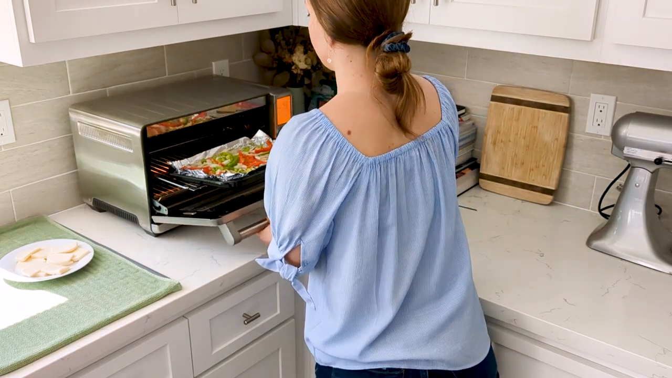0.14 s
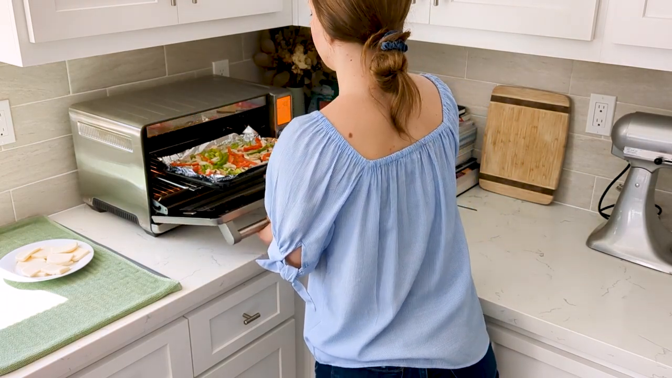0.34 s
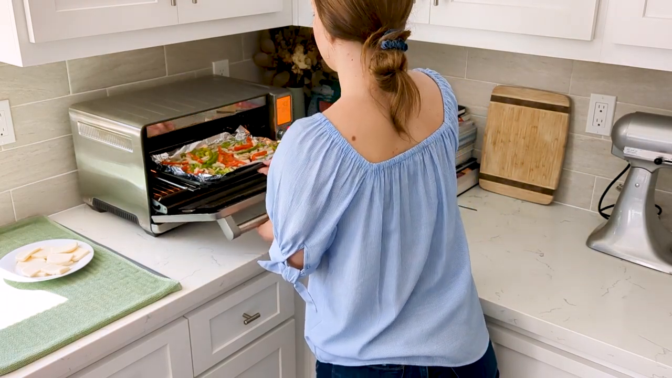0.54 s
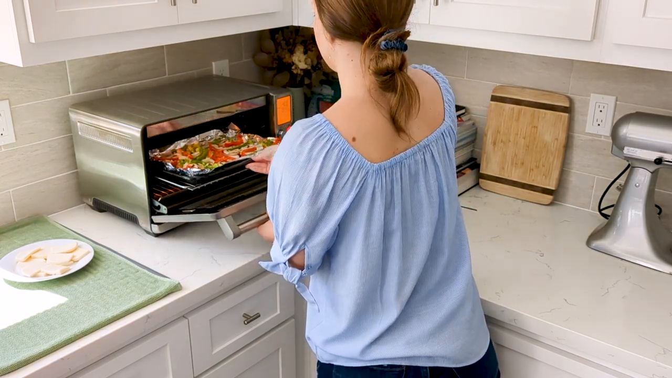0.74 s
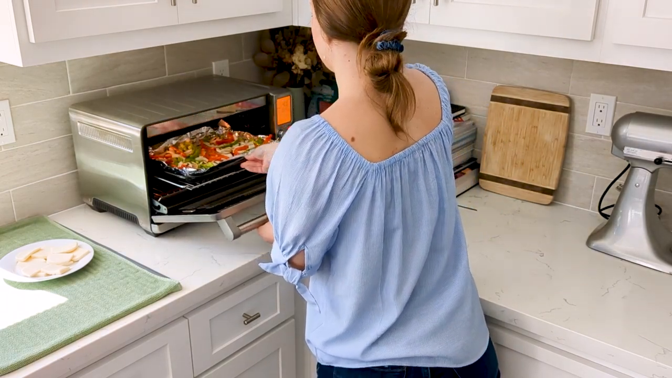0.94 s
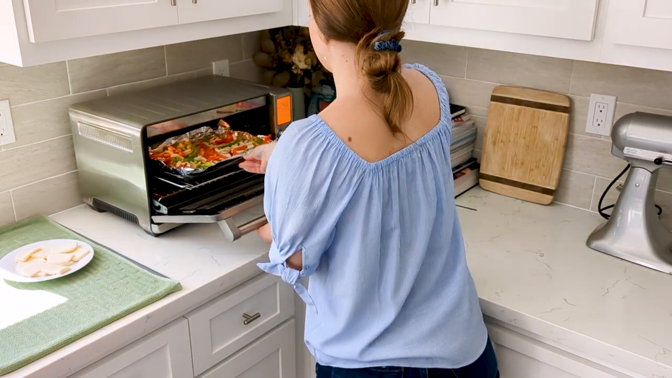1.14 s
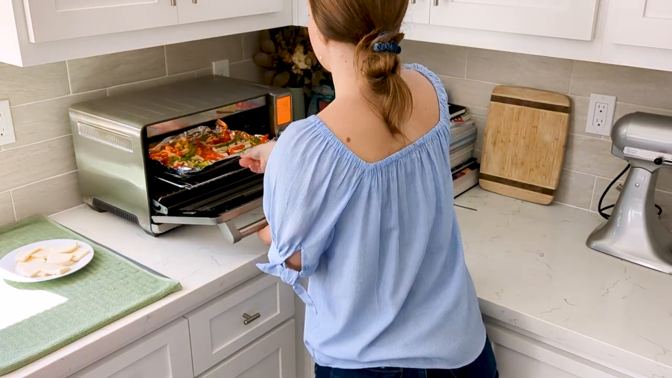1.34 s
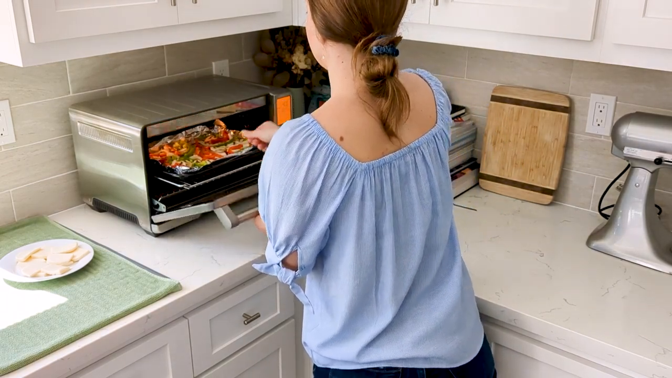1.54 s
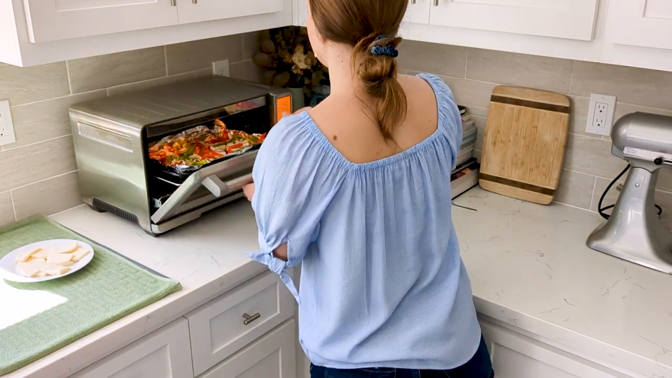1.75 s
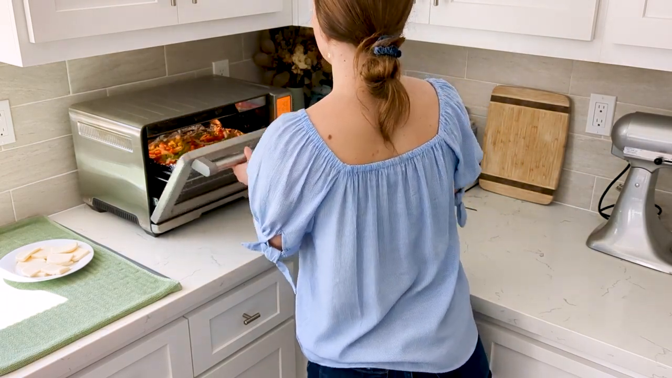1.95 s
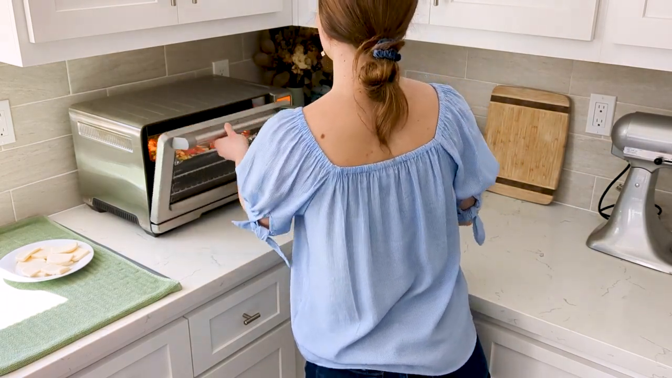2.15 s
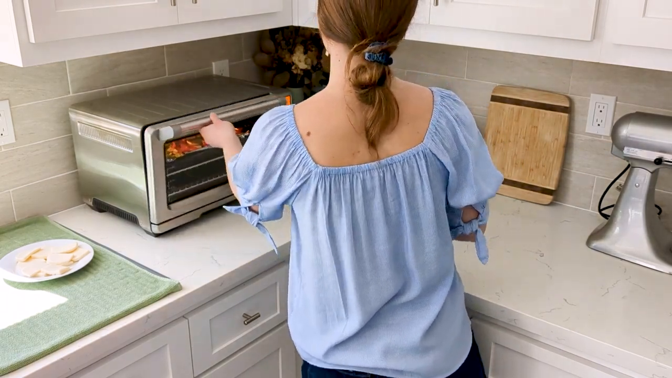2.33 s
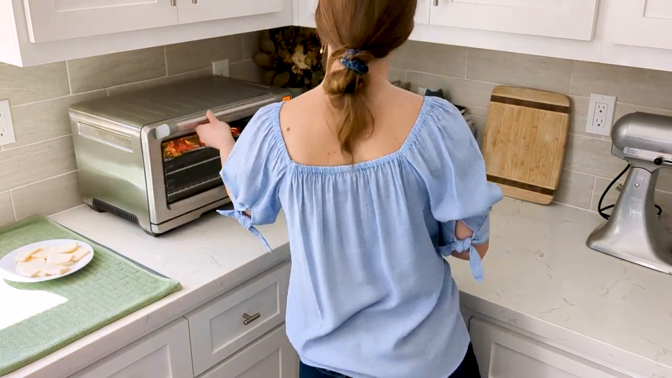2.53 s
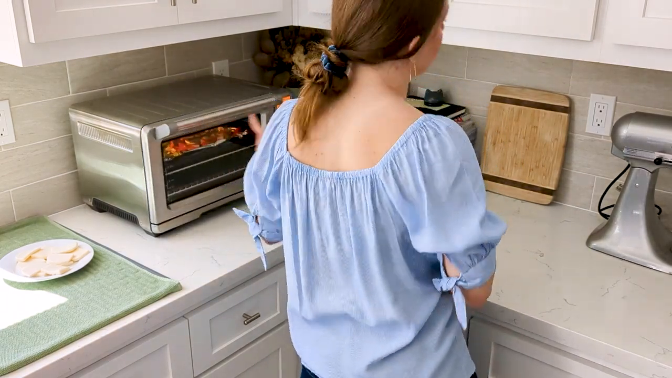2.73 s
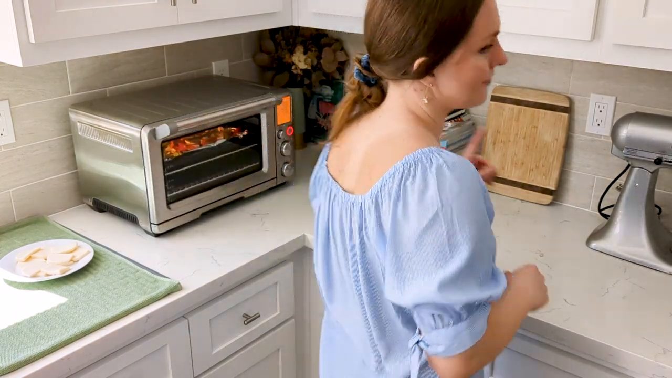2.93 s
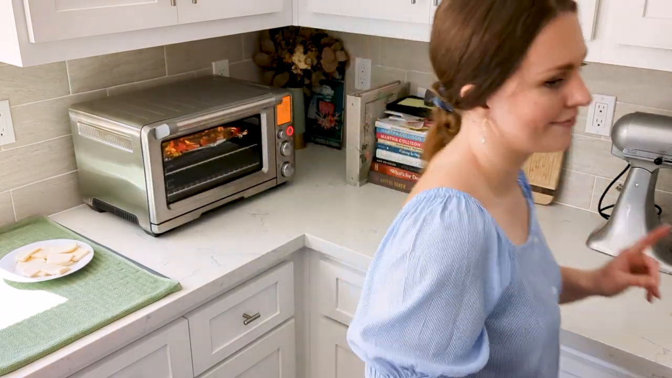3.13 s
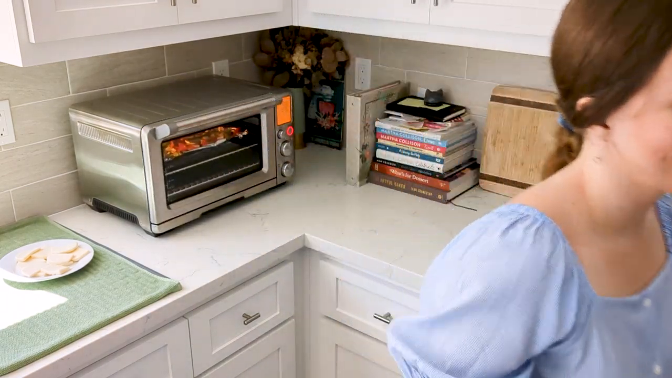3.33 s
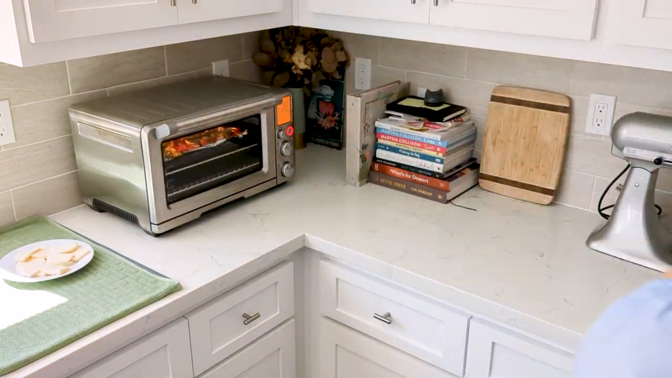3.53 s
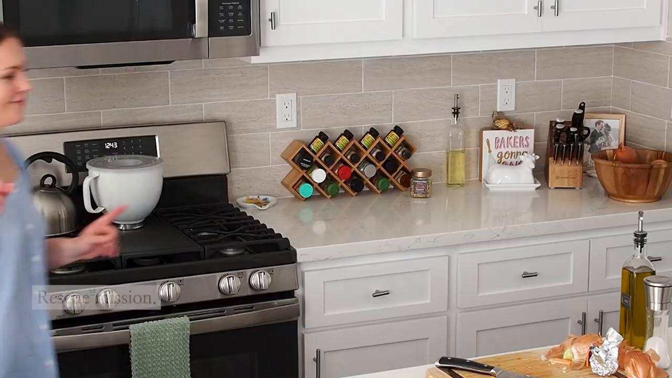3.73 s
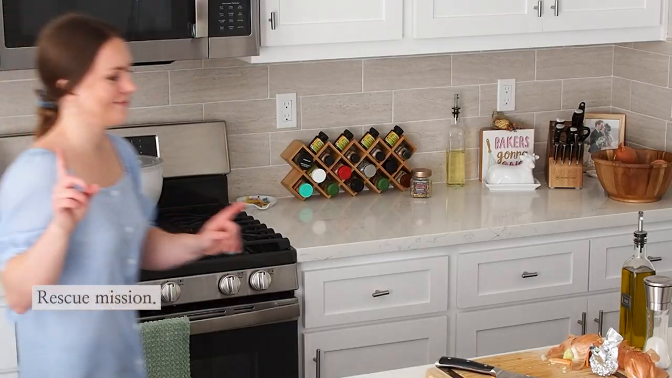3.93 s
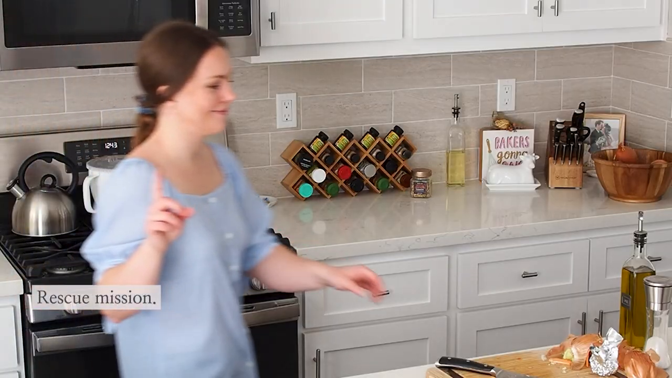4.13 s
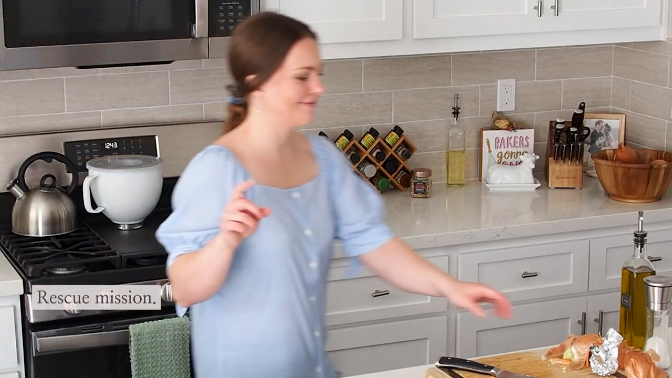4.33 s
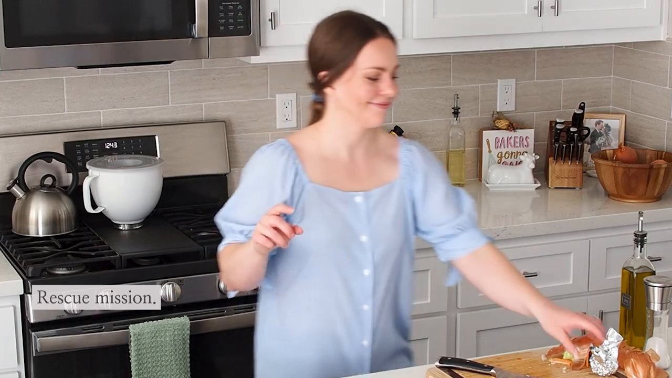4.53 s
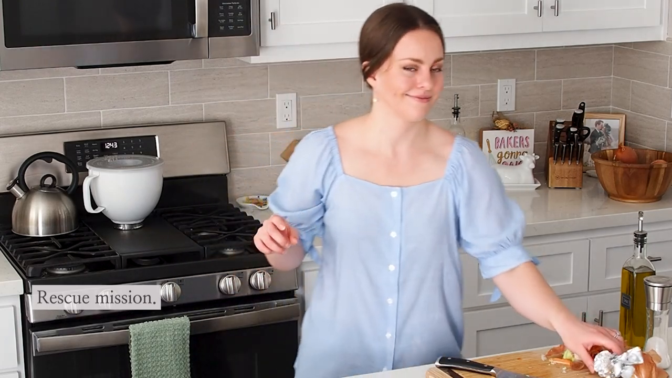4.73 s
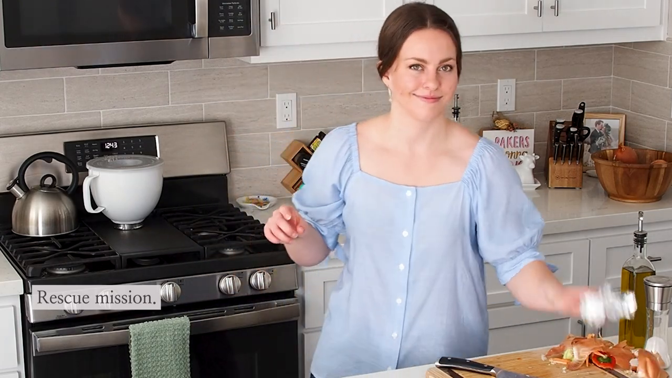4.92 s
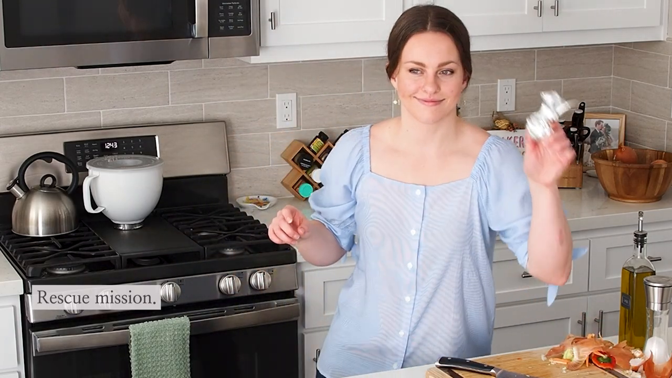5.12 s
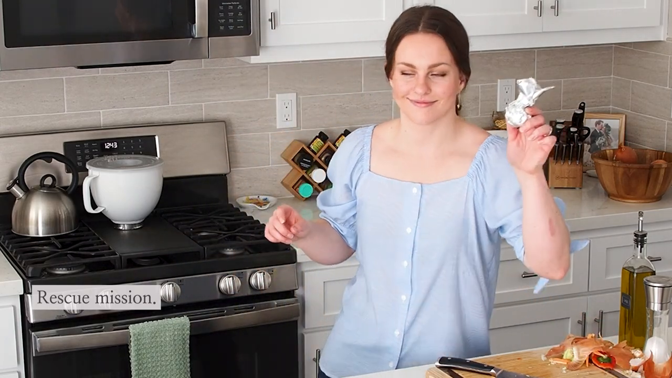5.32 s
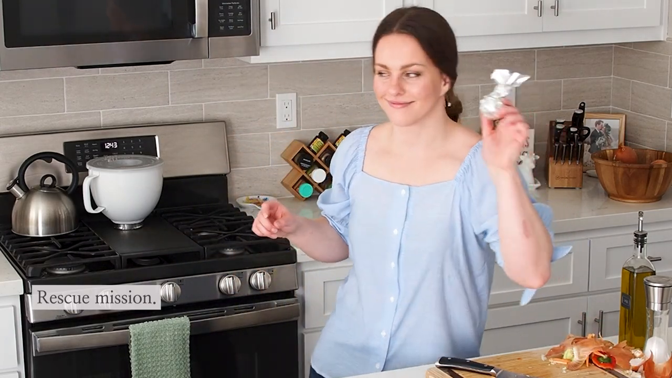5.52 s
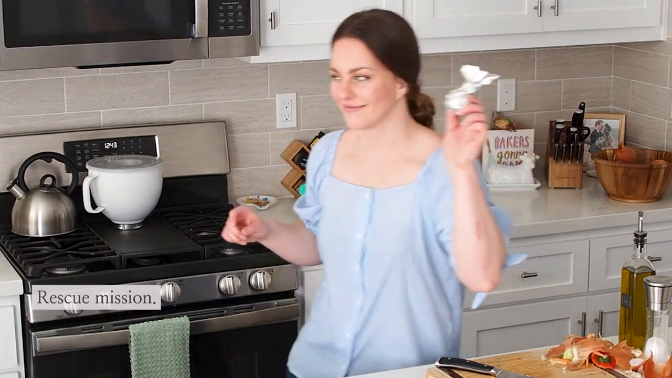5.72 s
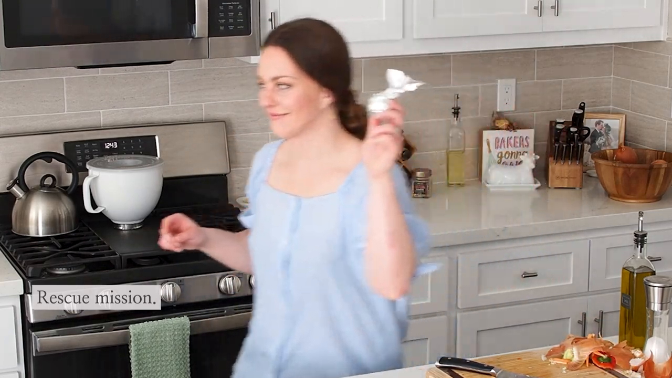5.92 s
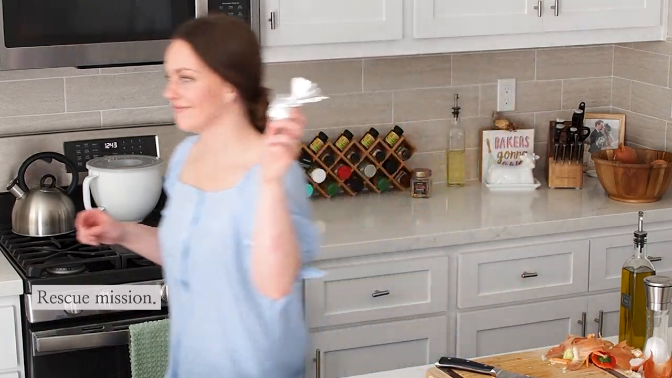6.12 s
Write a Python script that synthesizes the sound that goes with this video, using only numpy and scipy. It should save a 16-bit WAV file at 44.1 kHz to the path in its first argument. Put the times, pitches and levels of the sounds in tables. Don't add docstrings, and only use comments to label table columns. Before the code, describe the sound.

Close kitchen sounds: sheet pan rattling on wire rack, one sharp hinge jolt, muted oven door thud, fan hum, then crisp foil crumpling.

```python
import sys
import numpy as np
from scipy import signal
from scipy.fft import rfft, irfft, next_fast_len
from scipy.io import wavfile

SR = 44100
rng = np.random.default_rng(int(sys.argv[2]) if len(sys.argv) > 2 else 0)


def voltage_ratio(decibels):
    exponent = np.asarray(decibels, float) / 20
    return 10 ** exponent


def store_wav(level_fs):
    pcm = np.round(np.clip(np.atleast_2d(level_fs), -1, 1) * 32767)
    wavfile.write(sys.argv[1], SR, pcm.T.astype(np.int16))


N = 271920
TIME = np.arange(N) / SR
PAN_END = int(2.9 * SR)
LONGEST = int(.6 * SR)
SECOND_SPOT_S = 3.74
SHUT_S, SHUTTING_S = 1.5, 0.15

# [f/Hz, level/dB per Hz]
FAN_SPECTRUM = [(35, -46), (60, -20), (146, -12.5), (180, -25.5), (294, -16), (330, -8), (427, -19.5),
                (469, -12.5), (749, -19.5), (991, -19), (1250, -21), (7060, -39.5), (16000, -42.5)]
# [f/Hz, width/Hz, level/dB]
DUCT_RINGS = [(90, 10, 10.5), (145.6, 6.1, 10), (209, 17, 10.5), (326, 16, 1), (497, 7, 7.5),
              (1025.4, 11.5, 13), (1138, 43, 6), (1795, 73, 4)]
# [peak t/s, level/dB, half length/ms]
MIC_NUDGES = [(.14, -44.5, 72), (.38, -49, 70), (.62, -42, 90), (.98, -45, 180), (1.79, -51, 120),
              (2.0, -52, 70), (2.25, -47, 79), (2.53, -52, 70), (4.14, -50, 120), (4.5, -55, 170),
              (4.75, -45, 133), (5.15, -46.5, 74), (5.34, -52, 75), (5.63, -41.5, 59), (5.88, -55, 58),
              (6.06, -49, 57)]
# [f/Hz, t60/s]
ROOM_DECAY = [(100, 1), (1000, 0.67), (5000, 0.66), (14000, 0.4)]

# [t/s, level/dB, colour f/Hz]
FOIL_SNAPS = [(2.578, -62, 2700), (2.65, -55, 4500), (4.073, -43.5, 9500), (4.6154, -21.5, 6000),
              (4.62, -15, 3700), (5.121, -40, 2300), (5.1356, -34, 2780), (5.1523, -39, 2300),
              (5.224, -31, 2980), (5.607, -53, 9500), (5.623, -49, 10500), (5.8497, -49.5, 6000),
              (5.9399, -34, 5430), (5.9647, -50, 9000), (6.027, -47, 11500)]
# [t/s, level/dB, centre f/Hz, top end level/dB, length/ms]
FOIL_CRUMPLES = [(3.08, -73, 6500, -90, 59), (3.75, -66, 2980, -68, 180), (4.08, -60.5, 2350, -68, 170),
                 (4.272, -55.5, 2660, -67, 68), (4.468, -57.5, 5600, -60, 79), (4.47, -54.5, 1930, -80, 71),
                 (4.622, -32, 3700, -31, 16.8), (4.635, -42, 4500, -64, 41), (4.82, -56.5, 3970, -68, 31),
                 (5.045, -65, 4970, -63, 50), (5.097, -59, 8000, -61, 33), (5.09, -53, 2420, -55, 106),
                 (5.228, -56.5, 2980, -80, 55), (5.262, -65, 6500, -79, 18), (5.605, -79, 6000, -68, 29),
                 (5.73, -73, 6000, -70, 17), (5.89, -66, 5000, -75, 32), (5.95, -63, 6500, -77, 53)]
# [t/s, level/dB]
CLOTH_RUSTLE = [
    (2.5, -65),
    (2.65, -68),
    (3.42, -61),
    (3.81, -64),
    (3.93, -59),
    (4.7, -48),
    (4.83, -65),
    (5.6, -65),
    (6.17, -56.5),
]

# [t/s, level/dB, push/ms, ring/ms]
DOOR_PUSHES = [
    (2.418, -41, 1.5, 25),
    (2.4555, -19, 4.5, 56),
    (2.529, -29, 3, 62),
    (2.62, -43, 3, 50),
]
# [f/Hz, level/dB, t60/s]
DOOR_MODES = [(96, -10, .5), (127, 0, .9), (200, -16, .4), (335, -17, .25), (560, -24, .15),
              (760, -26, .12)]
# [t/s, f/Hz, level/dB, length/ms]
BRIEF_TONES = [(.04, 2500, -41, 70), (.045, 3030, -37, 56), (.04, 3740, -37, 65), (.04, 4960, -42, 68),
               (0.379, 118, -43, 500), (.47, 1460, -33.5, 50), (0.56, 608, -21.5, 55),
               (0.562, 760, -25, 41), (.561, 960, -27, 28), (0.979, 118, -46, 410), (1.779, 125, -45, 500),
               (1.93, 561.5, -27.5, 60), (2.36, 2600, -54, 22), (2.415, 328, -37, 37),
               (2.42, 3540, -54, 48), (3.531, 233, -53, 41), (4.55, 344, -47, 41), (5.94, 6500, -60, 97),
               (2.2, 109.3, -41.5, 90)]

# [t/s, level/dB, treble over level/dB, bass over level/dB, chatter/ms]
PAN_BOUNCES = [(0.038, -35.5, 10, -2, 25), (.075, -37, 2, -9, 150), (.256, -45, -15, -32, 12),
               (0.343, -20, 6.5, -1, 19.7), (0.37, -29.5, 13.5, -5, 29), (0.425, -21.5, 4, -11, 18),
               (.532, -44.5, 25.5, -14, 6), (0.562, -22, -1, -4, 36), (0.587, -28, 11, -16, 27.5),
               (0.647, -26, 10.5, -31, 22), (0.711, -18.5, -14, -4.5, 13.2), (.779, -30, 12, -13, 11.6),
               (0.862, -31, 3.5, 3.5, 25), (0.922, -31.5, -5.5, -2, 50), (1.048, -39, -35, -3, 48),
               (1.133, -40.5, -5, -1, 6.1)]
# [t/s, level/dB, treble over level/dB, bass over level/dB, chatter/ms]
HINGE_JOLTS = [(1.724, -49, -11.5, -12, 19), (1.743, -11.5, -0.5, -7, 20.3), (1.775, -26, -2.5, -5, 180),
               (1.875, -30.5, -1, 2, 26), (1.932, -28, 2, -6, 12), (1.991, -26, -9, 1.5, 12.4),
               (2.053, -30.5, -32, 11.5, 8.2), (2.128, -45, 5, 18.5, 16), (2.169, -34.5, -9, 3, 8),
               (2.225, -54, -12.5, 21.5, 26.2), (2.372, -54.5, 11, 13, 17), (2.396, -51, 16.5, 4, 16),
               (2.420, -48, -4, 17, 35), (2.468, -48, -6, 10, 51), (2.53, -59.5, -28, 11.5, 130)]
# [t/s, pressure as clatter level/dB]
PAN_SLIDES = [
    [(0.0, -36), (0.166, -49), (0.4, -40), (0.592, -34), (0.86, -32), (1.05, -48)],
    [(1.76, -81), (1.916, -54), (1.992, -67), (2.17, -64.5), (2.3, -75)],
]
# [f/Hz, level/dB per Hz]
PAN_SHEET = [(710, 0), (1200, -2.5), (2230, -3), (2650, -3.5), (2860, -4), (3910, -4), (4360, -9),
             (7660, -9.5), (15200, -26), (16000, -35)]
# [f/Hz, level/dB per Hz]
OVEN_BODY = [(53, -45), (90, -25), (151, -40), (190, -1.5), (334, -4.5), (420, -11), (589, -3), (758, -15),
             (1600, -16.5), (2080, -30), (3520, -120)]
# [f/Hz, level/dB, t60/s]
STRONG_RINGS = [(118, -7.5, 0.53), (193, 5.5, 0.3), (235.5, 0.5, 0.25), (339.3, 1, 0.72), (400.2, 1, 0.12),
                (563, 0, 0.23), (598, -1.5, 0.072), (694, -9, 0.1), (801, -13.5, 0.35), (897, -26, 0.086),
                (1161, 1.5, 0.066), (1460, -9, 0.095), (1754, -4, 0.19), (2240, -5, 0.4),
                (2435, -5.5, 0.11), (2817, -6, 0.082), (2970, 8, 0.046), (3350, 4, 0.034),
                (3420, -14, 0.16), (3720, -4, 0.11), (4880, 8, 0.059), (6290, 0, 0.094), (6500, -10, .07),
                (7200, -8.5, 0.07)]


def along(table, hz):
    f, v = np.transpose(table)
    return np.interp(np.log(np.maximum(hz, 1)), np.log(f), v)


def unit(x):
    return x / np.sqrt(np.mean(x ** 2))


def colour(x, gain_of_hz):
    size = next_fast_len(len(x))
    hz = np.arange(size // 2 + 1) * SR / size
    return irfft(rfft(x, size) * gain_of_hz(hz), size)[:len(x)]


def band(x, hz, sharp):
    return unit(colour(x, lambda f: np.exp(-sharp * np.log2(np.maximum(f, 1) / hz) ** 2)))


def split(deep, bright, hz):
    low = signal.butter(2, hz, "lowpass", fs=SR, output="sos")
    high = signal.butter(2, hz, "highpass", fs=SR, output="sos")
    return signal.sosfilt(low, deep) - signal.sosfilt(high, bright)


def through(x, response):
    return signal.fftconvolve(x, response / np.sqrt(np.sum(response ** 2)))[:len(x)]


def decay(t, t60):
    return np.exp(-np.log(1000) * t / t60)


def curve(table, column):
    rows = np.array(table)
    return voltage_ratio(np.interp(TIME, rows[:, 0], rows[:, column], left=-120, right=-120))


def bursts(table, column, rise, edge):
    gain = np.zeros(N + LONGEST)
    age = np.arange(LONGEST) / SR
    for row in table:
        k = int((row[0] - .002) * SR)
        fall = np.exp(-(age / (row[-1] / 1000)) ** edge)
        gain[k:k + LONGEST] += voltage_ratio(row[column]) * (1 - np.exp(-age / rise)) * fall
    return gain[:N]


def by_spot(first, second):
    return np.where(TIME < SECOND_SPOT_S, first, second)


def contacts(rate, spread_db):
    happens = rng.random(N) < rate / SR
    size = rng.standard_normal(N) * voltage_ratio(spread_db * rng.exponential(size=N))
    return unit(happens * size)


def ring(hz, db, t60, length):
    t = np.arange(int(length * SR))[:, None] / SR
    sign = rng.choice([-1., 1.], np.shape(db))
    return (decay(t, t60) * np.sin(2 * np.pi * hz * t)) @ (voltage_ratio(db) * sign).T


def strike(x, hz, db, t60, scatter_db, hold):
    spots = 6
    weights = db + scatter_db * rng.standard_normal((spots, len(hz)))
    spot = np.repeat(rng.integers(0, spots, len(x) // hold + 1), hold)[:len(x)]
    responses = ring(hz, weights, t60, length=0.13).T
    return sum(through(x * (spot == k), response) for k, response in enumerate(responses))


def sheet(x, table, count, t60_at_1k, slope):
    lo, hi = table[0][0], min(table[-1][0], .4 * SR)
    hz = lo + (hi - lo) * (np.arange(count) + rng.random(count)) / count
    uneven_db = 2.5 * np.clip(rng.standard_normal(count), -2, 1)
    t60 = t60_at_1k * (hz / 1000) ** -slope * voltage_ratio(uneven_db)
    db = along(table, hz) - 10 * np.log10(t60)
    return strike(x, hz, db, t60, scatter_db=2.5, hold=40)


def room(x, wet_db):
    t = np.arange(int(.8 * SR)) / SR
    tail = 0
    for hz in 60 * 2. ** np.arange(9):
        noise = rng.standard_normal(len(t))
        octave = colour(noise, lambda f: np.exp(-2 * np.log2(np.maximum(f, 1) / hz) ** 2))
        tail = tail + octave * decay(t, along(ROOM_DECAY, hz))
    build_up = np.clip(t / 0.0078, 0, 1)
    return x + voltage_ratio(wet_db) * through(x, tail * build_up)


def fan():
    def duct(f):
        resonances = sum(db / (1 + ((f - hz) / width) ** 2) for hz, width, db in DUCT_RINGS)
        return voltage_ratio(along(FAN_SPECTRUM, f) + resonances)
    air = unit(colour(rng.standard_normal(N), duct))
    open_db, shut_db, second_db = -50.5, -55.5, -49.5
    first_db = np.interp(TIME, [SHUT_S - SHUTTING_S, SHUT_S + SHUTTING_S], [open_db, shut_db])
    return air * voltage_ratio(by_spot(first_db, second_db)) * voltage_ratio(1.5)


def microphone_rumble():
    def low(f):
        return f / 25 / (1 + (f / 25) ** 2) / (1 + (f / 85) ** 4)
    rumble = unit(colour(rng.standard_normal(N), low))
    nudged = sum(voltage_ratio(db) * np.exp(-((TIME - s) / (ms / 1000)) ** 2) for s, db, ms in MIC_NUDGES)
    return rumble * (voltage_ratio(by_spot(-55, -57.5)) + nudged) * voltage_ratio(-1.0)


def foil():
    out = np.zeros(N)
    t = np.arange(int(.06 * SR)) / SR
    for s, db, hz in FOIL_SNAPS:
        burst = rng.standard_normal(len(t)) * (np.exp(-t / .0011) + .17 * np.exp(-t / .012))
        edges_hz = [hz / 2.4, min(hz * 1.93, .34 * SR)]
        tint = signal.butter(3, edges_hz, "bandpass", fs=SR, output="sos")
        k = int(s * SR)
        out[k:k + len(t)] += voltage_ratio(db + 3.5) * signal.sosfilt(tint, burst)
    fine = contacts(15000, 0.47)
    rustle = curve(CLOTH_RUSTLE, 1)
    hiss = voltage_ratio(by_spot(-102, -81.5))
    crumple_top = bursts(FOIL_CRUMPLES, column=3, rise=0.0034, edge=5.9)
    out += band(fine, hz=10600, sharp=0.77) * (hiss + voltage_ratio(-28) * rustle + crumple_top)
    out += band(fine, hz=3300, sharp=0.36) * voltage_ratio(-5.5) * rustle
    for row in FOIL_CRUMPLES:
        k = int(row[0] * SR)
        near = slice(k - 500, k + 12000)
        gain = bursts([row], column=1, rise=0.0057, edge=6.5)[near]
        out[near] += band(fine[near], row[2], sharp=1.14) * gain
    return out


def door_thud():
    t = np.arange(int(.3 * SR)) / SR
    out = np.zeros(N)
    modes = -sum(voltage_ratio(db) * decay(t, t60) * np.sin(2 * np.pi * hz * t) for hz, db, t60 in DOOR_MODES)
    for s, db, ms, ring_ms in DOOR_PUSHES:
        push = np.sin(np.pi * np.clip(t / (ms / 1000), 0, 1)) / (ms * SR / 1000)
        shape = (1 - np.exp(-t / .006)) * np.exp(-(t / (ring_ms / 1000)) ** 6)
        k = int(s * SR)
        out[k:k + len(t)] += voltage_ratio(db + 6.0) * signal.fftconvolve(push, modes)[:len(t)] * shape
    return out


def brief_tones():
    out = np.zeros(N)
    rub = rng.standard_normal(N)
    for s, hz, db, ms in BRIEF_TONES:
        near = slice(int(s * SR) - 500, int(s * SR) + LONGEST)
        gain = bursts([(s, db, ms)], column=1, rise=0.0017, edge=1.7)[near]
        out[near] += band(rub[near], hz, sharp=330) * gain
    return out


def pan_drag():
    firm_db, drag_db, slope = -33.5, -37.5, 0.62
    drag = 0
    for s in PAN_SLIDES:
        moving = (TIME < s[-1][0]) * (TIME >= s[0][0])
        drag = drag + (curve(s, 1) / voltage_ratio(firm_db)) ** slope * moving
    return voltage_ratio(drag_db) * drag


def pan():
    slide = sum(curve(s, 1) for s in PAN_SLIDES)
    drag = pan_drag()
    rows = []
    for s, db, top, deep, ms in PAN_BOUNCES + HINGE_JOLTS:
        rows.append((s, db, db + top, db + 0.84 * deep + 0.14, db + deep - 2.8, ms))
    level, treble, knock, box = (bursts(rows, c, rise=0.0024, edge=1.16) * voltage_ratio(-1.5) for c in (1, 2, 3, 4))
    hits, thumps = contacts(5000, 1.3), contacts(3000, 0.88)
    clatter = split(hits * (level + slide), hits * (treble + voltage_ratio(-2.5) * slide), hz=4040)[:PAN_END]
    body = split(thumps * (box + drag), thumps * (knock + drag), hz=480)[:PAN_END]
    knock_force = (thumps * (knock + voltage_ratio(-8) * drag))[:PAN_END]
    box_force = (thumps * (box + voltage_ratio(-5.0) * drag))[:PAN_END]

    out = sheet(clatter, PAN_SHEET, count=400, t60_at_1k=0.086, slope=0.5)
    out = out + voltage_ratio(-3) * sheet(body, OVEN_BODY, count=60, t60_at_1k=0.03, slope=0.44)
    hz, db, t60 = np.transpose(STRONG_RINGS)
    low, high = hz < 400, hz > 1300
    mid = ~low & ~high
    for force, part, share_db in ((clatter, high, -10), (knock_force, mid, -3), (box_force, low, -3)):
        out = out + voltage_ratio(share_db) * strike(force, hz[part], db[part], t60[part], scatter_db=5, hold=2500)
    return np.pad(out, (0, N - PAN_END))


def scene():
    background = fan() + microphone_rumble()
    door = room(door_thud() + brief_tones(), wet_db=-17)
    near = room(pan() + foil(), wet_db=-10.5)
    return (near + door + background)[None]


def band_limit(x):
    return signal.sosfilt(signal.butter(12, 16450, fs=SR, output="sos"), x)


def record(dry):
    top = signal.ellip(10, .2, 70, 15850, fs=SR, output="sos")
    mix = signal.sosfilt(top, dry)
    return band_limit(mix)


dry = scene()
out = record(dry)
store_wav(out)
```